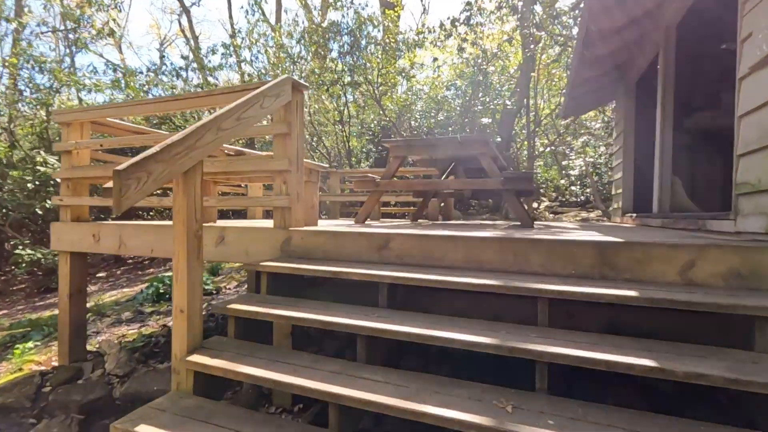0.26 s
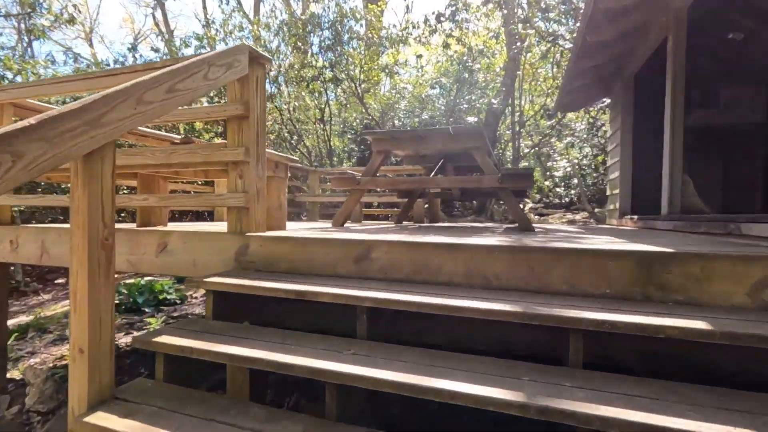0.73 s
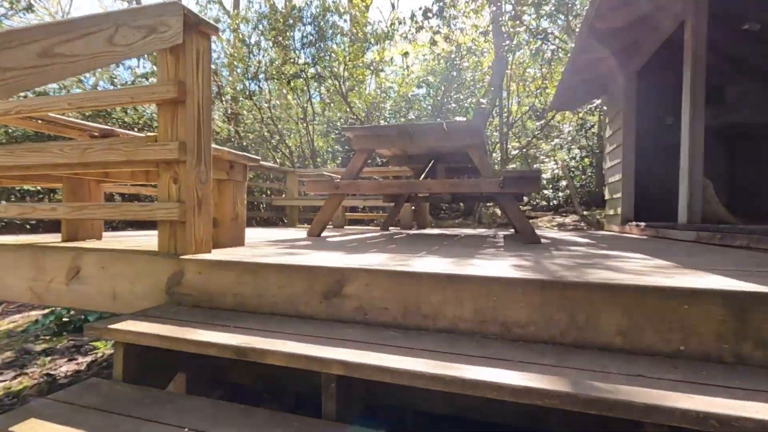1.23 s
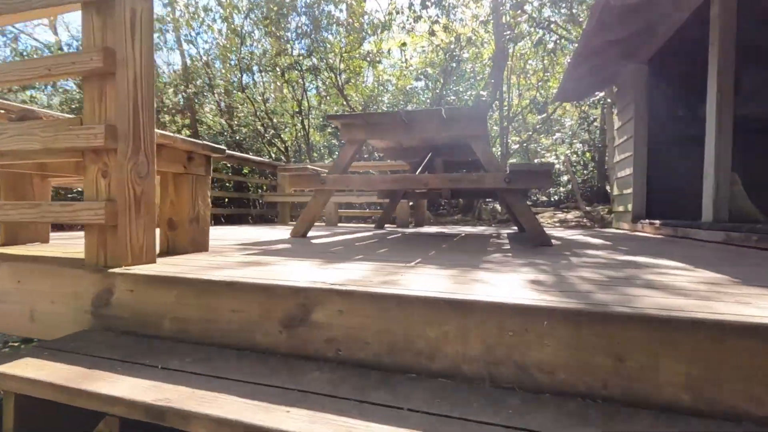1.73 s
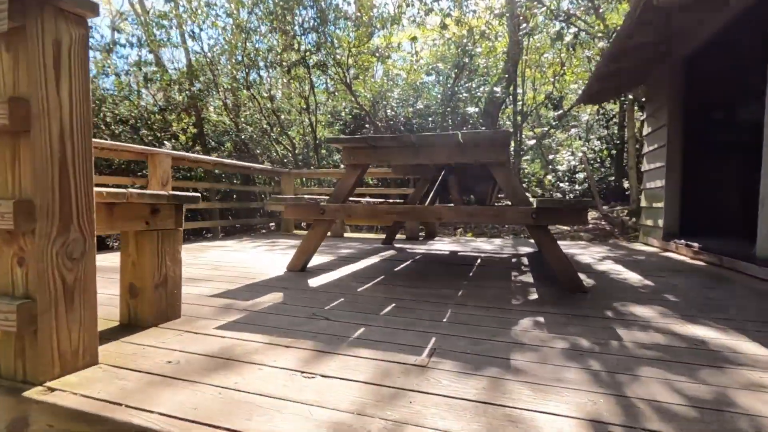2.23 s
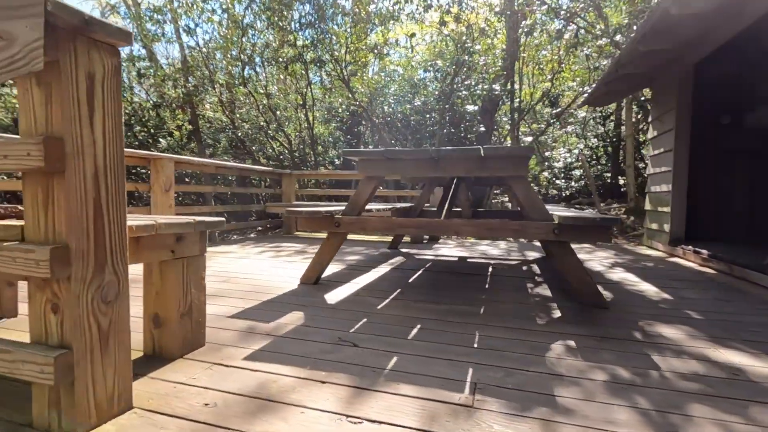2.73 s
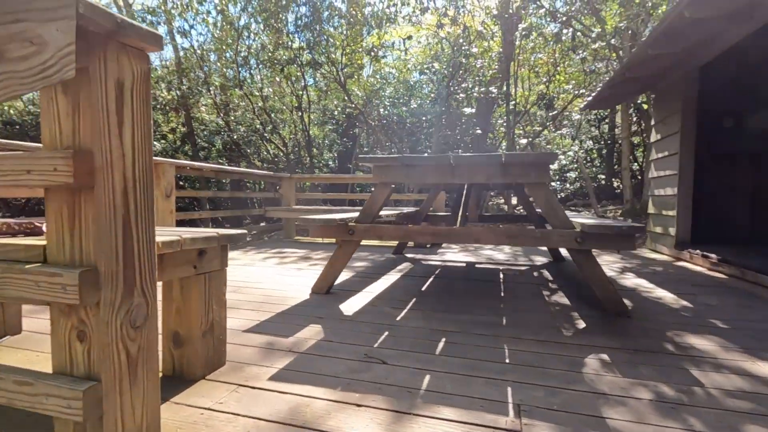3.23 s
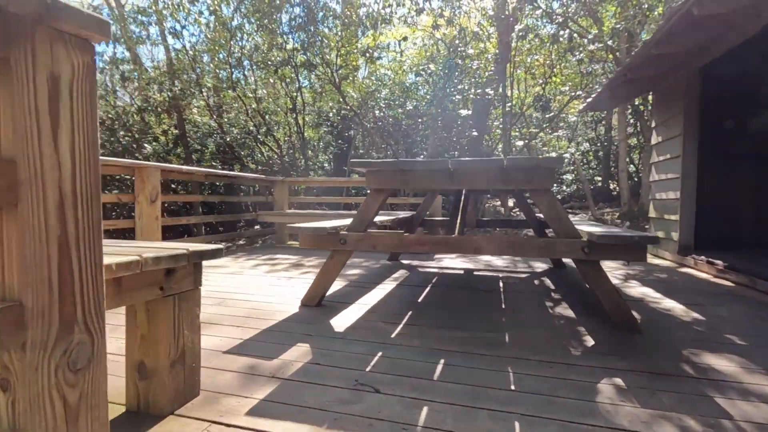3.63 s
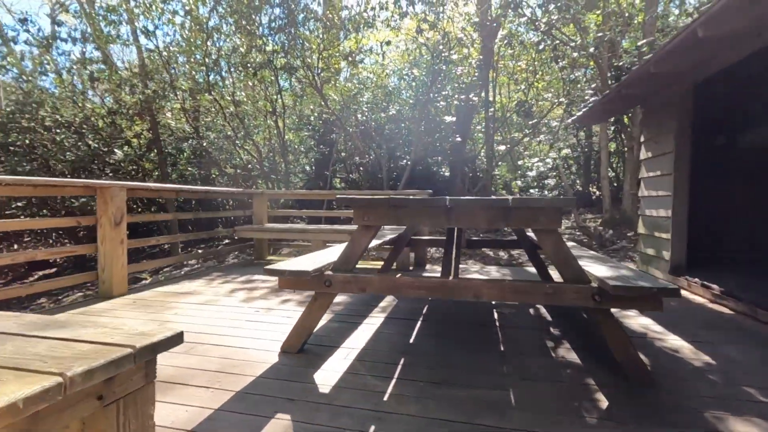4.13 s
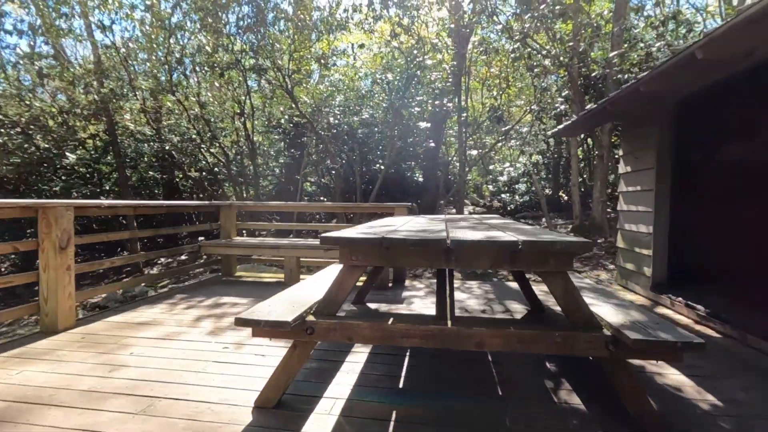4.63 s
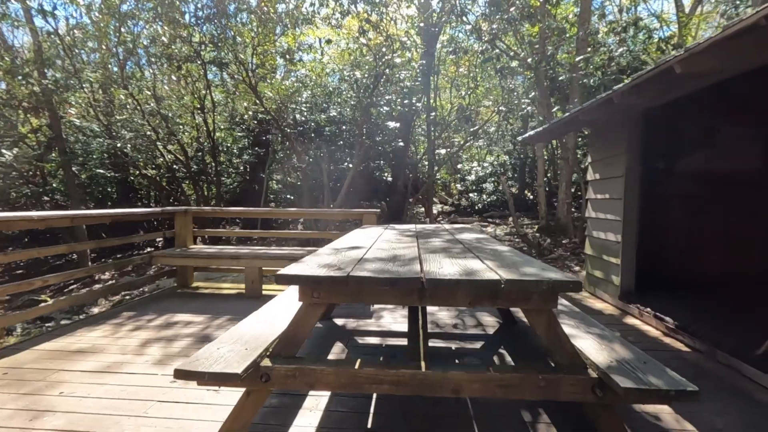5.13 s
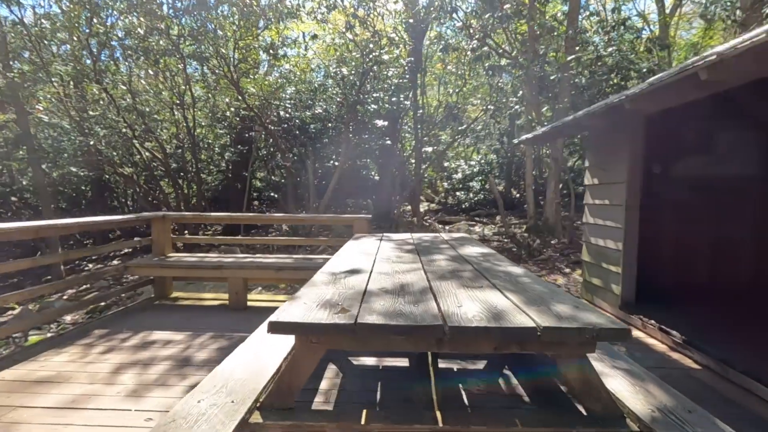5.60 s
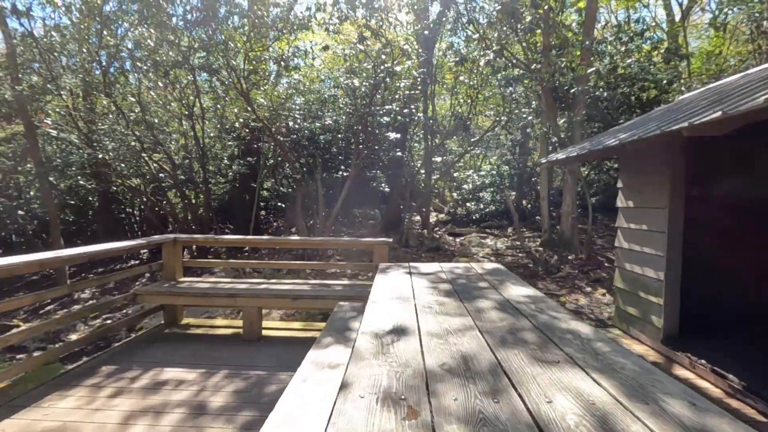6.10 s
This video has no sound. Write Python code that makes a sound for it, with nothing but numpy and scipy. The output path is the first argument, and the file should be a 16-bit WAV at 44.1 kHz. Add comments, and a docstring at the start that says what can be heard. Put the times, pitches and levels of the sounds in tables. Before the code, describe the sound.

Footsteps crack and thud up wooden steps and across a hollow plank deck while a songbird whistles sliding notes over a faint woodland rustle.

```python
"""A light breeze and the walker's sway rumble on a small carried stereo microphone; the wood rustles.
Short cracks and knocks, dragging soles and heels on planks follow as someone climbs steps and crosses a deck.
A songbird whistles sliding phrases that hang among the trees; grit ticks and, later, a plank creaks.
Rumble, rustle and scuffs are shaped noise; whistles and creak are gliding sines.
Cracks, knocks and footfalls are short blows through resonances and narrow bands."""
import sys
import numpy as np
from scipy import signal
from scipy.fft import rfft, irfft
from scipy.io import wavfile

SR = 44100
rng = np.random.default_rng(int(sys.argv[2]) if len(sys.argv) > 2 else 0)


def store_wav(level_fs):
    """Save 16-bit WAV to argv[1]."""
    pcm = np.round(np.clip(np.atleast_2d(level_fs), -1, 1) * 32767)
    wavfile.write(sys.argv[1], SR, pcm.T.astype(np.int16))


N = 280194   # length [samples]


def from_db(db):
    """Turns decibels into a plain multiplier."""
    return 10 ** (np.asarray(db) / 20)


def rms_one(x):
    """Scales a sound to an average (rms) level of 1."""
    return x / np.sqrt(np.mean(x ** 2) + 1e-20)


def in_time(rows):
    """Draws straight lines between timed rows: one curve per column after the time."""
    s, *columns = np.transpose(rows)
    return [np.interp(np.arange(N) / SR, s, column) for column in columns]


def at_hz(points, hz):
    """Reads a table of (frequency, value) at any frequency, on a musical (log) scale."""
    table = np.array(points)
    return np.interp(np.log(hz), np.log(table[:, 0]), table[:, 1])


def panned(x, pan_db):
    """Makes left louder than right by pan_db, half of it on each side."""
    return x * from_db(np.multiply.outer([.5, -.5], pan_db)).reshape(2, -1)


def add(out, s, sound):
    """Mixes a stereo sound in from time s on."""
    i = max(round(s * SR), 0)
    out[:, i:i + sound.shape[1]] += sound[:, :N - i]


def drift(rate_hz):
    """Slow random wandering with spread 1: smoothed noise, drawn every 40 samples."""
    r = np.exp(-2 * np.pi * rate_hz * 40 / SR)
    noise = rng.standard_normal(N // 40 + 2002)
    slow = signal.lfilter([1], [1, -2 * r, r * r], noise)[2000:]   # skip the filter's start
    return np.interp(np.arange(N) / 40, np.arange(len(slow)), rms_one(slow))


def ring(x, hz, t60):
    """A resonance: a unit click sets a sine ringing from height 1, down 60 dB after t60 seconds."""
    r = from_db(-60 / (max(t60, .001) * SR))
    w = 2 * np.pi * hz / SR
    return signal.lfilter([0, np.sin(w)], [1, -2 * r * np.cos(w), r * r], x + 1e-18)


def struck(blow, modes):
    """One blow rings every mode of a solid body; peak 1."""
    sound = sum(from_db(db) * ring(blow, hz, t60) for hz, db, t60 in modes)
    return sound / np.abs(sound).max()


# How alike left and right are: (frequency [Hz], likeness [0 to 1])
LIKENESS_BY_HZ = [(60, 0.94), (240, 0.88), (920, 0.23), (3620, 0.48), (14200, 0.033)]
# Microphone sensitivity, left over right: (frequency [Hz], level difference [dB])
LEFT_LEAD_BY_HZ = [(60, 4.5), (240, -4), (920, 6), (3620, 3.0), (14200, 5)]


def banded_noise(spectrum, patchy_db, flicker):
    """Stereo noise of a given spectrum whose half-octave bands each waver in level; rms 1."""
    hz = np.maximum(np.arange(N // 2 + 1) * SR / N, 1)
    lowest, highest = spectrum[0][0], spectrum[-1][0]
    # mix a shared noise with an opposed one
    mid, side = rfft(rng.standard_normal((2, N)))
    alike = np.clip(at_hz(LIKENESS_BY_HZ, hz), 0, 1)
    pair = np.sqrt(1 + alike) * mid + np.sqrt(1 - alike) * side * [[1], [-1]]
    shape = from_db(at_hz(spectrum, hz)) * (hz >= lowest) * (hz <= highest)
    pair = panned(pair * shape, at_hz(LEFT_LEAD_BY_HZ, hz))
    out, together = 0, drift(1.0)
    for centre in np.arange(np.log2(lowest), np.log2(highest) + .5, .5):
        band = np.clip(1 - 2 * np.abs(np.log2(hz) - centre), 0, 1)
        wander = 0.9 * together + drift(flicker)
        out = out + from_db(patchy_db * wander) * irfft(pair * band, N)
    return rms_one(out)


# Moving air on the microphone ports: (time [s], deep sway level [dB], buffeting level [dB])
WIND_LEVELS = [(0, -37, -63), (.7, -41.5, -64), (.95, -25.5, -56.5), (1.6, -38.5, -61.5), (1.8, -46, -61.5),
               (2.2, -34.5, -53), (2.7, -45.5, -66.5), (3.0, -38.5, -48.5), (3.5, -46.5, -60),
               (4.1, -33.5, -48.5), (4.35, -44, -63.5), (5.3, -41.5, -54), (6.35, -37.5, -54)]
# Spectrum of the deep sway: (frequency [Hz], level per Hz [dB])
SWAY_SPECTRUM = [(2, 15), (5, -2), (12, -2.5), (22, -0.5), (35, -9)]
# Spectrum of the buffeting: (frequency [Hz], level per Hz [dB])
BUFFET_SPECTRUM = [(20, -65), (37, -15), (81, -12), (187, -13), (500, -37), (900, -39)]


def wind():
    """Breeze and the walker's sway push air over the ports: a deep rumble and a higher buffeting."""
    sway_db, buffet_db = in_time(WIND_LEVELS)
    sway = from_db(sway_db) * banded_noise(SWAY_SPECTRUM, patchy_db=3.5, flicker=16.0)
    buffeting = from_db(buffet_db) * banded_noise(BUFFET_SPECTRUM, patchy_db=3.0, flicker=46.0)
    return panned(sway, -10.0) + buffeting


# Rustle of the wood: (time [s], level [dB], extra gain of the treble [dB])
RUSTLE_LEVELS = [(0, -66.5, 19.5), (.28, -54.5, 2), (.58, -65, 11.5), (1.0, -61.5, 9.5), (1.98, -58, 15),
                 (2.62, -56.5, 3.5), (3.0, -62, 6.5), (3.52, -65.5, 12), (4.03, -63.5, 14.5),
                 (5.04, -66.5, 10.5), (5.61, -63, 14.5), (6.35, -63, -10)]
# Spectrum of the rustle before that treble gain: (frequency [Hz], level per Hz [dB])
RUSTLE_SPECTRUM = [(180, 10), (300, -4), (504, -0.5), (744, -9), (1470, 1), (1910, -4), (2430, -3),
                   (3960, -6), (7100, -14.5), (10800, -34), (12500, -35), (14500, -40)]
TREBLE_HZ = 7960   # the treble starts about here


def rustle():
    """Leaves give a patchy broad hiss; its top end has a level of its own."""
    level_db, treble_db = in_time(RUSTLE_LEVELS)
    hiss = banded_noise(RUSTLE_SPECTRUM, patchy_db=1.2, flicker=6.0)
    low = signal.sosfiltfilt(signal.butter(2, TREBLE_HZ, fs=SR, output="sos"), hiss)
    treble = hiss - low
    return from_db(level_db) * (low + from_db(treble_db) * treble)


def snaps(events, cycles, burst_s):
    """Brief noisy contacts, each ringing a few cycles about its centre frequency."""
    out, t = np.zeros((2, N)), np.arange(SR // 8) / SR
    for s, peak_db, hz, pan_db in events:
        blow = rng.standard_normal(len(t)) * np.exp(-t / burst_s)
        mode = [(hz, 0, cycles / hz)]
        snap = struck(struck(blow, mode), mode)   # ringing twice narrows the sound about its centre
        add(out, s, panned(from_db(peak_db) * snap, pan_db))
    return out


# Sharp heel-edge cracks of the footfalls, and small low knocks on wood and on the microphone housing:
# (time [s], peak before panning [dB], centre [Hz], left over right [dB])
CRACK_AND_KNOCK_EVENTS = [(.152, -44, 1580, 4), (.241, -34, 597, 3.5), (.259, -25.5, 790, 2.5),
                          (.273, -30.5, 1180, 0), (1.344, -29.5, 187, -2), (1.381, -29.5, 1730, 5),
                          (2.749, -51, 1360, 36.5), (4.4145, -19.5, 1860, 10), (4.915, -48, 447, -13),
                          (5.0815, -20.5, 1385, 5), (5.087, -28, 1250, 14), (5.315, -34.5, 236, -5),
                          (5.336, -29.5, 270, -7.5), (5.447, -40, 1340, -2), (5.667, -36, 265, 4),
                          (5.672, -45.5, 2730, -14), (6.105, -47, 264, 0)]


def cracks_and_knocks():
    """Each heel-edge crack or small knock is a tiny noise burst that rings one short resonance."""
    return snaps(CRACK_AND_KNOCK_EVENTS, cycles=3.84, burst_s=0.0016)


def faint_grit():
    """Forty faint high ticks at random times, mostly near the weakest level."""
    chance = rng.random((40, 3))
    return [(s * N / SR, -63 + 8 * size ** 2, 5200 * 2 ** pitch) for s, size, pitch in chance]


# Louder grit snapping under the soles: (time [s], peak before panning [dB], centre [Hz])
LOUD_TICKS = [(1.001, -44.5, 5340), (1.309, -29.5, 7200), (1.382, -29, 6700), (1.8998, -44, 5960),
              (1.995, -36.5, 5926), (2.098, -40.5, 6750), (2.12, -40, 6000), (4.1947, -44, 4730),
              (4.219, -39.5, 6600), (4.526, -57, 10500), (4.7761, -47, 8100), (4.892, -43.5, 7260)]


def grit():
    """Grains snap under the soles: very short high resonances, 6 dB louder on the left."""
    return snaps([(*tick, 6.0) for tick in LOUD_TICKS + faint_grit()], cycles=4.0, burst_s=0.0017)


# Soles dragged over gritty wood: (time [s], rise [s], level at the top before panning [dB], centre [Hz])
SCUFF_EVENTS = [(0.225, 0.0088, -56, 1420), (0.344, 0.0062, -52, 3500), (0.82, 0.042, -50, 2780),
                (1.272, 0.024, -38.5, 3620), (1.357, 0.029, -44.5, 3650), (1.737, 0.0095, -54.5, 5000),
                (2.109, 0.042, -42.5, 4500), (2.369, 0.038, -55, 6000), (3.245, 0.018, -48, 750),
                (4.56, 0.02, -57, 1500), (5.225, 0.021, -55.5, 1300), (5.898, 0.047, -59.5, 1390),
                (6.259, 0.0044, -49.5, 3700)]
SCUFF_T60_S = 0.17   # time to fade by 60 dB


def scuffs():
    """Grainy friction noise swells and dies; two octaves wide about its centre."""
    out, t = np.zeros((2, N)), np.arange(SR // 2) / SR
    for s, rise, level_db, hz in SCUFF_EVENTS:
        sizes = np.minimum(rng.exponential(1, len(t) // 50), 3.0)
        grain = from_db(2.7 * np.repeat(sizes, 50))   # a new loudness every 50 samples
        near, apart = rng.standard_normal(len(t)), rng.standard_normal((2, len(t)))
        band = signal.butter(1, [hz / 2, min(hz * 2, .45 * SR)], "band", fs=SR, output="sos")
        rub = rms_one(signal.sosfilt(band, (near + .7 * apart) * grain))
        fade = from_db(level_db - 60 * np.maximum(t - rise, 0) / SCUFF_T60_S)
        swell = np.clip(t / rise, 0, 1) ** 0.89 * fade
        add(out, s, panned(rub * swell, 4.7))
    return out


def thud(clusters, t, crack, octaves):
    """Each cluster of modes gives a crack and a rattling tail, longer after a soft landing; peak 1."""
    rattles = (rng.random(len(t)) < 90 / SR) * rng.uniform(1, 4, len(t))   # about 90 a second
    rattles[0] = 4.1
    knocks = 0.85 + signal.lfilter([1], [1, -np.exp(-1 / (0.0049 * SR))], rattles)
    sound = 0
    for hz, db, t60 in clusters:
        noise = rng.standard_normal(len(t)) + 0.15 * rng.standard_normal((2, len(t)))
        noise = noise * knocks * from_db(-60 * t * np.sqrt(crack / 3.77) / t60)
        noise[:, 0] = crack * np.sqrt(SR / hz)   # the crack is one strong first sample
        edges = [hz / 2 ** octaves, hz * 2 ** octaves]
        band = signal.butter(2, edges, "band", fs=SR, output="sos")
        sound = sound + from_db(db) * signal.sosfilt(band, noise) / np.sqrt(hz)
    return sound / np.abs(sound).max()


# Footfalls: (time [s], knock level [dB], weight on the frame [dB], plank pitch [Hz], plank level [dB],
# plank ring time t60 before each mode's share [s], sharpness of the landing [no unit])
FOOTFALL_EVENTS = [(0.2571, -36, -56, 108, -37, 0.085, 7.1), (0.817, -39, -45, 128, -42, 0.12, 1.4),
                   (1.287, -36.5, -42, 209, -46, 0.067, 5.6), (1.88, -32, -34.5, 104.1, -33.5, 0.91, 8.4),
                   (1.8993, -44.5, -45, 121, -28.5, 0.56, 0.82),
                   (2.1474, -29.5, -33.5, 136, -20.5, 0.076, 12), (2.3152, -41, -62, 145, -50, 0.24, 3.5),
                   (2.382, -35, -65, 246.7, -39, 0.32, 7.1), (2.4048, -39, -63, 130, -26, .18, 37),
                   (2.9601, -44.5, -37, 109.3, -41, 0.32, 10),
                   (3.718, -20.5, -21.5, 230.7, -20.5, 0.29, 9.2), (3.934, -48, -58, 96.9, -41.5, 1, 0.8),
                   (4.4143, -29, -32.5, 175.4, -25.5, 0.44, 6.3), (4.463, -49, -39, 91.6, -30, 0.52, 1.6),
                   (4.559, -39, -34, 105, -31.5, 0.081, 4.5), (5.0824, -28, -29.5, 179.4, -23.5, 0.16, 5.9),
                   (5.231, -47.5, -33, 98.3, -36, 0.49, 4.6), (5.7495, -29.5, -32.5, 99.7, -32, 0.11, 5.1)]
# Joists under the deck: (frequency [Hz], level [dB], ring time t60 [s])
FRAME_MODES = [(33.9, 0.5, 1), (44, 0, 0.6), (58.8, 14.5, 0.77)]
# Clusters of close wood modes, narrow in the board, wide under the heel:
# (centre [Hz], relative level [dB], fade time t60 for a landing of sharpness 3.77 [s])
BOARD_CLUSTERS = [(292.6, -3, 0.3), (383.8, -1, 0.32), (475, -0.5, 0.29), (552, 1, 0.27)]
HEEL_CLUSTERS = [(1005, 2, 0.46), (1213, 5.5, 0.29), (1653, 4.5, 0.23), (2370, -0.5, 0.17),
                 (3640, -10.5, 0.24)]
# Modes of a plank: (multiple of its pitch, level [dB], share of its ring time)
PLANK_MODES = [(1, 4, 0.88), (.62, -12, 1), (1.3, -5.5, 0.44)]
BOARD_UNDER_HEEL_DB = -1


def footfalls():
    """The heel cracks on the board, the plank rings under the rolling sole, the frame feels a softer push."""
    out, t = np.zeros((2, N)), np.arange(SR * 3 // 4) / SR
    for s, knock_db, frame_db, plank_hz, plank_db, plank_t60, sharp in FOOTFALL_EVENTS:
        heel = thud(HEEL_CLUSTERS, t, sharp, octaves=.22)
        board = from_db(BOARD_UNDER_HEEL_DB) * thud(BOARD_CLUSTERS, t, sharp, octaves=.07)
        bright = from_db(knock_db) * (heel + board)
        roll = 0.086 * rng.standard_normal(len(t)) * np.exp(-t / 0.033)
        roll[0] = 1.75   # first contact
        modes = [(plank_hz * k, db, plank_t60 * share) for k, db, share in PLANK_MODES]
        plank = from_db(plank_db) * struck(roll, modes)
        push = np.sin(np.pi * np.clip(t / 0.0042, 0, 1)) ** 2   # a smooth 4.2 ms bump
        frame = from_db(frame_db) * struck(push, FRAME_MODES)
        add(out, s, panned(bright, 4.7) + plank + frame)
    return out


TREES_T60_S = 1   # long tail of the echo


def trees(x):
    """Near trunks and the hut wall throw quick echoes, the wood a long tail; different in each ear."""
    t = np.arange(SR) / SR
    decay = from_db(-60 * t / TREES_T60_S) + from_db(7 - 60 * t / 0.16)
    tail = rng.standard_normal((2, SR)) * decay * np.clip(t / 0.007, 0, 1)
    dull = signal.sosfilt(signal.butter(2, 5500, fs=SR, output="sos"), tail)
    tail = dull + (tail - dull) * from_db(-120 * t)   # leaves and air swallow the treble sooner
    tail = tail / np.sqrt(np.sum(tail ** 2, axis=1, keepdims=True))
    return signal.fftconvolve(x[None], tail, axes=1)[:, :N]


def whistle(notes, flutter_db, waver):
    """Near sines gliding along each note, with soft ends and a slightly unsteady level and pitch."""
    out, t = np.zeros(N), np.arange(N) / SR
    unsteady = 1 + waver * drift(123.1)
    for rows in notes:
        hz, level_db = in_time(rows)
        start, end = rows[0][0], rows[-1][0]
        ends = np.clip(np.minimum(t - start, end - t) / 0.0056 + 1, 0, 1)
        tone = np.sin(2 * np.pi * np.cumsum(hz * unsteady) / SR)
        out += np.sqrt(2) * ends * from_db(level_db) * tone
    return out * from_db(flutter_db * drift(45))


def held(s, length, hz, level_db):
    """A steady note as rows of time, pitch and level."""
    return [(s, hz, level_db), (s + length, hz, level_db)]


SWELL_DB_PER_S, FADE_DB_PER_S = 74.5, 132.5


def sung(loudest, level_db, path):
    """A gliding note as rows: it grows to its loudest moment, then fades."""
    rows = sorted(path + [(loudest, np.interp(loudest, *np.transpose(path)))])
    drops_db = [max(SWELL_DB_PER_S * (loudest - s), FADE_DB_PER_S * (s - loudest)) for s, hz in rows]
    return [(s, hz, level_db - drop) for (s, hz), drop in zip(rows, drops_db)]


# Songbird notes: (loudest moment [s], level there [dB], pitch path of (time [s], pitch [Hz]))
SONG_NOTES = [(0.671, -56, [(.645, 2653), (.67, 2380), (.69, 2330)]), (.74, -50.5, [(.725, 3055),
              (.745, 3414), (.78, 3264)]), (1.86, -51.5, [(1.70, 2265), (1.765, 2536), (1.805, 2637),
              (1.87, 2060), (1.89, 2214)]), (2.104, -52, [(2.095, 2370), (2.13, 2300)]),
              (2.25, -45, [(2.17, 2390), (2.225, 3166), (2.245, 3235), (2.28, 3163)]),
              (2.5, -48.5, [(2.415, 2364), (2.465, 2384), (2.50, 2125), (2.55, 2097)]),
              (2.599, -51.5, [(2.555, 2180), (2.58, 2620), (2.597, 1866), (2.645, 1674)]),
              (2.933, -44.5, [(2.79, 2656), (2.85, 2804), (2.917, 2688), (2.933, 3087), (2.95, 3363),
              (2.964, 2404), (3.03, 2290)]), (3.27, -50, [(3.23, 3430), (3.25, 3153), (3.265, 3290),
              (3.273, 3560), (3.29, 3800)]), (3.436, -48.5, [(3.352, 1930), (3.385, 2340), (3.418, 2885),
              (3.435, 2176), (3.445, 2106), (3.46, 2250)]), (3.771, -44, [(3.64, 2810), (3.67, 2967),
              (3.715, 2816), (3.755, 2475), (3.82, 2354), (3.93, 2540)]), (4.133, -45, [(4.015, 2162),
              (4.06, 2200), (4.115, 2338), (4.155, 2225), (4.20, 1830), (4.27, 1617)])]
# Thin level notes, mostly of farther birds; the 7 ms one at 1.024 s is a brief blip: (time [s], length [s],
# pitch [Hz], level [dB])
THIN_NOTES = [(0.712, 0.051, 3680, -62), (1.024, 0.0074, 1586, -61.5), (1.744, 0.1, 3250, -62),
              (2.319, 0.013, 1427, -62), (2.374, 0.045, 1534, -58), (2.411, 0.035, 2660, -57),
              (2.817, .13, 4920, -66.5), (3.648, 0.032, 3400, -59.5), (3.731, 0.065, 7445, -55)]
# A blur of many distant birds, as one wavering note: (time [s], length [s], centre [Hz], level [dB])
DISTANT_CHORUS = (2.76, .3, 4200, -65.5)
BIRD_PAN_DB, TREES_DB = 3, 1.5   # left over right; echo against direct sound


def birds():
    """Whistled notes are near sines; their echo hangs among the trees."""
    song = whistle([sung(*note) for note in SONG_NOTES], flutter_db=3.2, waver=.013)
    song = song + whistle([held(*note) for note in THIN_NOTES], flutter_db=2.0, waver=.006)
    song = song + whistle([held(*DISTANT_CHORUS)], flutter_db=3.0, waver=.05)
    return panned(song + from_db(TREES_DB) * trees(song), BIRD_PAN_DB)


# A plank creaks under load, one gliding note: (time [s], pitch [Hz], level [dB])
CREAK_GLIDE = [(2.2, 377, -58), (2.268, 456, -49.5), (2.32, 429, -52)]


def creak():
    """The loaded plank gives a gliding, slightly unsteady tone."""
    return whistle([CREAK_GLIDE], flutter_db=1.0, waver=.004)


# A hoarse low rubbing swells and fades: (time [s], level [dB])
GROAN_LEVELS = [(2.36, -83), (2.42, -53), (2.53, -53), (2.72, -68.5)]
GROAN_HZ = 660


def groan():
    """Hoarse rubbing: noise in one broad resonance."""
    level_db = np.interp(np.arange(N) / SR, *np.transpose(GROAN_LEVELS), left=-200, right=-200)
    return from_db(level_db) * rms_one(ring(rng.standard_normal(N), GROAN_HZ, .009))


SHADOW_HZ = 7340   # treble above this is shaded


def walker():
    """Cracks, knocks, scuffs, footfalls and straining wood, echoed by trees, shaded by the walker's body."""
    strain = panned(creak() + groan(), 12.3)
    feet = cracks_and_knocks() + scuffs() + footfalls() + strain
    # trunks are too thin to return the bass
    high_pass = signal.butter(2, 240, "high", fs=SR, output="sos")
    echoing = signal.sosfilt(high_pass, feet.mean(axis=0))
    feet = feet + from_db(-14.0) * trees(echoing)
    return signal.sosfilt(signal.butter(2, SHADOW_HZ, fs=SR, output="sos"), feet)


def scene():
    """Wind on the ports, the rustle of the wood, the walker, grit and birds."""
    return wind() + rustle() + walker() + grit() + birds()


CUTOFF_HZ = 14800


def record(dry):
    """The top is cut steeply: 60 dB down from the cutoff upward."""
    return signal.sosfilt(signal.cheby2(12, 60, CUTOFF_HZ, fs=SR, output="sos"), dry)


dry = scene()
out = record(dry)
store_wav(out)
```